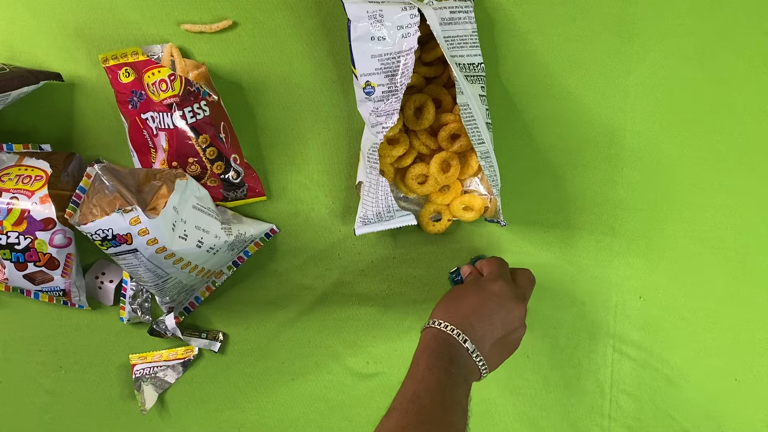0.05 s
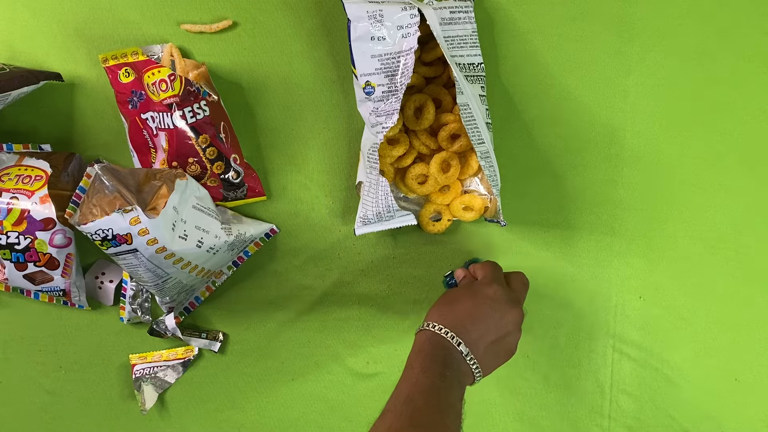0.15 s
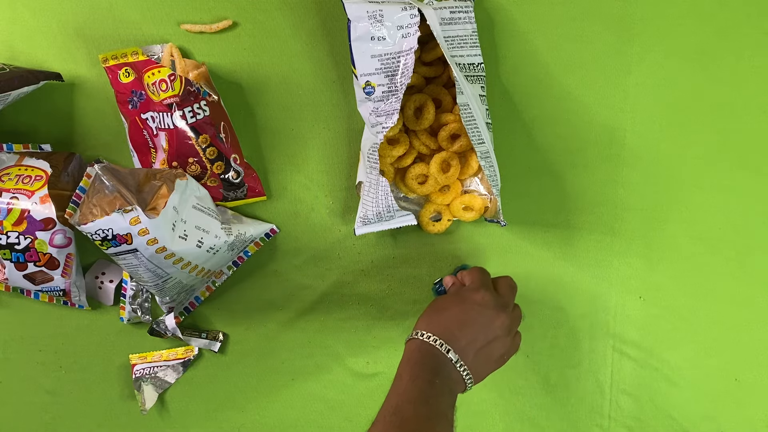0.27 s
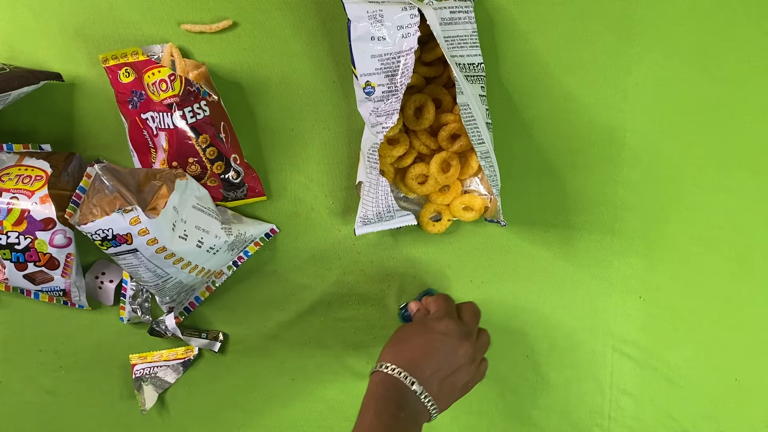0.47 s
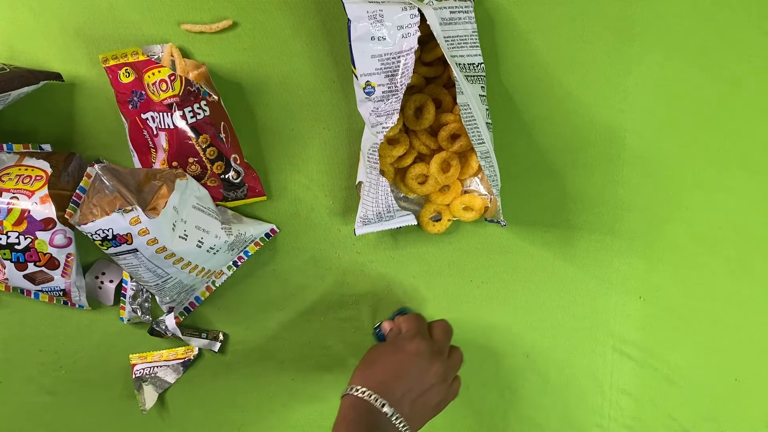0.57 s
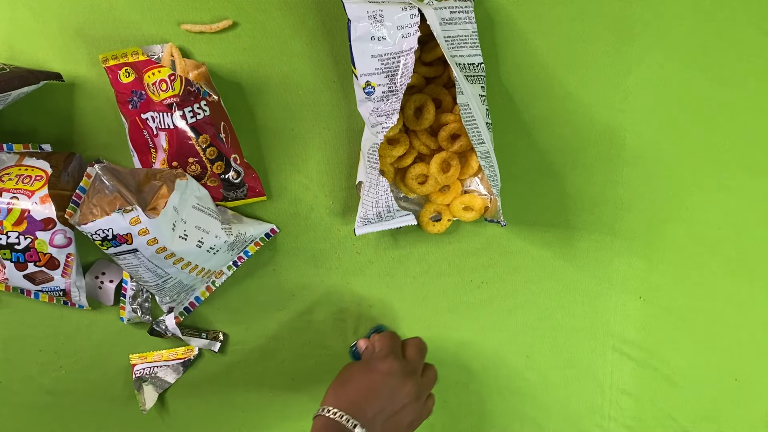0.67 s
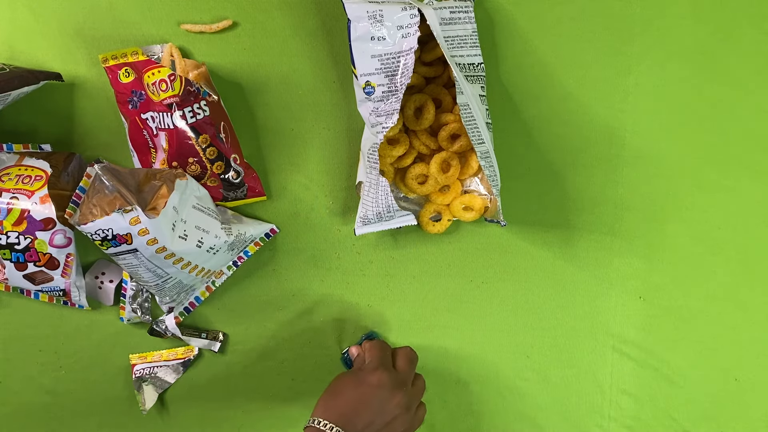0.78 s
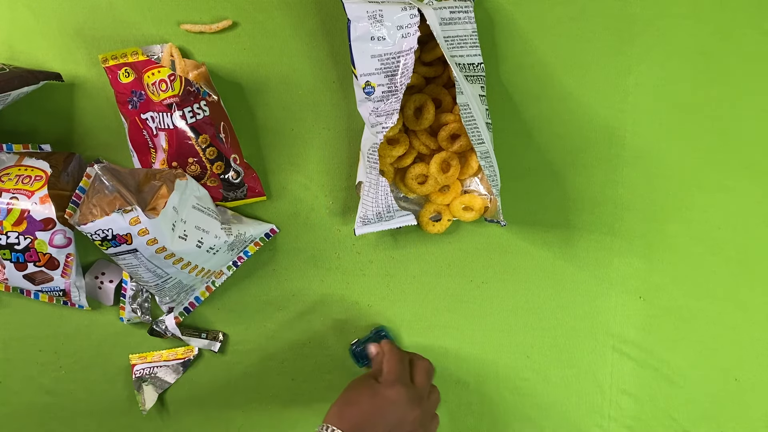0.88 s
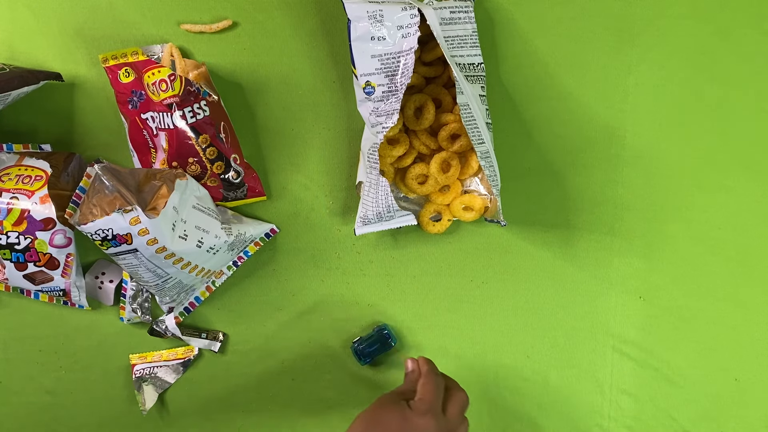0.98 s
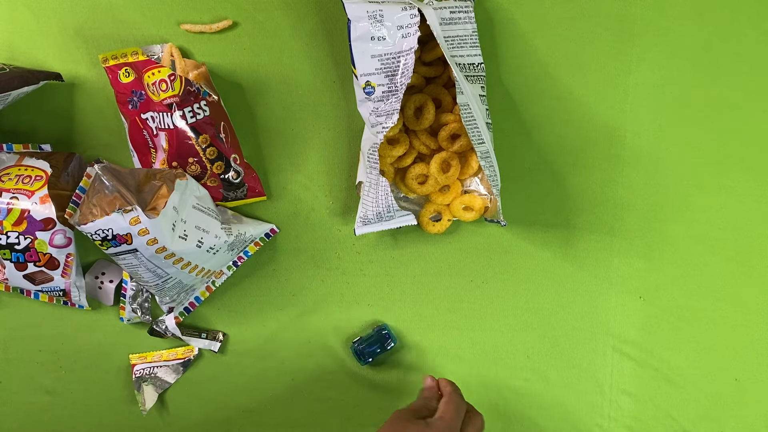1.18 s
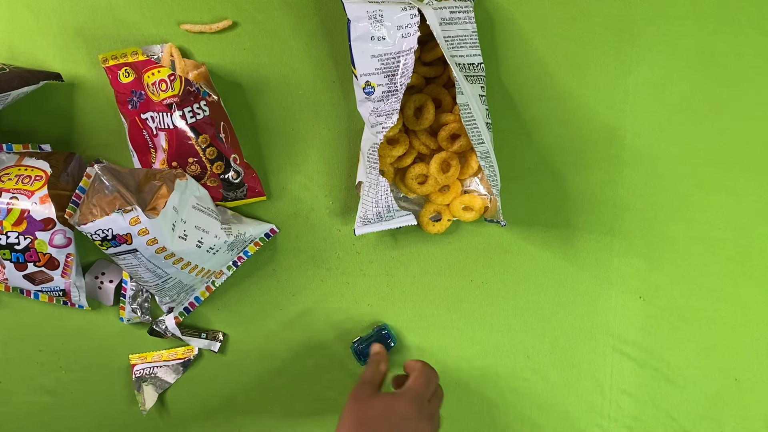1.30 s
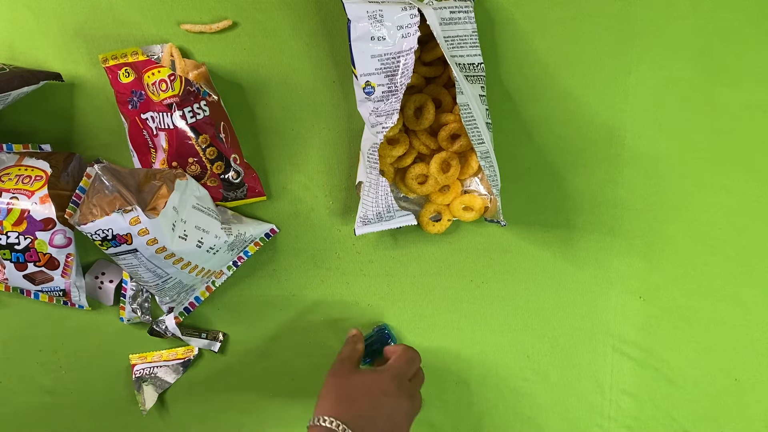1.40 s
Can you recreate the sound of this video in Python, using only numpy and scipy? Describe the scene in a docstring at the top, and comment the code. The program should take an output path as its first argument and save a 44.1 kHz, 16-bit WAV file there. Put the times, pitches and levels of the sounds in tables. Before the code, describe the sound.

A small plastic pull-back toy ratchets with quick clicks across a table, then a light tap.

```python
"""A table in a bare, quiet room with a low hum, a stereo pair of microphones close by.
A small plastic pull-back toy is drawn across the top: its ratchet snaps fifteen times, faster and then
easing off. Each snap rings the hollow shell and knocks the chassis, over faint gear chatter, wheel
rumble and soft thuds in the table. The fingers let go with two light taps and the spring rings."""
import sys
import numpy as np
from scipy import signal
from scipy.fft import rfft, irfft, next_fast_len
from scipy.io import wavfile

SR = 44100
rng = np.random.default_rng(int(sys.argv[2]) if len(sys.argv) > 2 else 0)


def unload_audio(sound):
    """Save the sound as a 16-bit wav file, at the path given as the first command line argument."""
    columns = np.transpose(np.atleast_2d(sound))
    # keep every value between -1 and 1, then stretch to whole-number steps
    steps = np.round(np.clip(columns, -1, 1) * 32767)
    wavfile.write(sys.argv[1], SR, steps.astype(np.int16))


N = 63945

# room tone spectrum: f/Hz, level/dB
ROOM_TONE = [(15, -50.5), (25, -24), (55, -3), (100, -4), (150, -12), (210, -14), (300, -20), (420, -25.5),
             (750, -31), (1400, -40.5), (6000, -46), (10000, -56.5), (15000, -63)]
ROOM_TONE_DB, HUM_HZ, HUM_DB = -65, 95.7, -73
# likeness of room tone and rumble at the two microphones: f/Hz, correlation
COHERENCE = [(60, .95), (250, 0.92), (600, 0.74), (2000, 0.11)]

# level of gear chatter and wheel rumble, a faint fading tail at the start, then the pull: t/s, level/dB
ROLLING_LEVEL = [(0, -19.5), (.03, -42.5), (0.141, -35.5), (0.168, -19.5), (.235, -26), (0.269, -6),
                 (.37, -10), (.42, -5.5), (.55, -2), (.64, -3.5), (0.712, -3), (.75, -14.5), (0.949, -20.5),
                 (1.0, -53.5)]
# gear chatter spectrum: f/Hz, level/dB
GEARS = [(300, -12), (1100, -7), (1900, -6), (2800, 3), (3300, 1.5), (3900, -4), (5000, -8), (6700, 2),
         (8400, -6), (10500, -11.5), (13300, -16), (15300, -12.5)]
# spectrum of wheels on the table: f/Hz, level/dB
WHEELS = [(25, -24.5), (60, 2), (100, -6.5), (160, -5), (230, -3), (380, -14), (700, -16.5), (1500, -32.5),
          (4000, -48)]
GEAR_DB, TEETH_PER_S, WHEEL_DB = -47, 900, -55.5

# fingers gripping and letting go: t/s, level/dB
TAPS = [(0.167, -56), (0.2059, -53), (0.8763, -32), (0.9089, -42.5)]
# spectrum of a tap on the body: f/Hz, level/dB
TAP_COLOUR = [(200, -6.5), (600, -19.5), (1100, -1.5), (1900, -4.5), (2800, 4.5), (3600, -0.5),
              (4250, -3.5), (4700, 2.5), (5300, -8.5), (6700, 1.5), (10000, -7), (15500, -10.5)]
TAP_DB, TAP_RISE_S, TAP_RING_DB = -7.5, 0.0025, -10.5
BRUSH_DB, BRUSH_S = -14.5, 0.01
# spring modes: multiple of SPRING_HZ, level/dB
SPRING_MODES = [(0.999, 5), (1.015, -7), (1.077, -7), (1.68, 1), (1.72, -8.5), (1.76, -9)]
SPRING_HZ, SPRING_DB, SPRING_T60_S = 2765, -23.5, 0.24

# bumps through the table top: t/s, level/dB
BUMPS = [(.245, -54), (.37, -56.5), (0.577, -48), (.61, -45.5), (0.948, -54.5), (1.105, -54.5),
         (1.344, -57.5)]

# ratchet snaps: t/s, snap level/dB, knock level/dB, ring level/dB, shell f/Hz
SNAPS = [(0.2461, -19.3, -46, -36, 2720), (0.3058, -18.5, -46, -39, 2740), (0.3581, -20.4, -49, -38, 2670),
         (0.4017, -20.7, -50, -33, 2670), (0.4375, -20.5, -44, -36, 2640), (0.4672, -19.2, -44, -43, 2830),
         (0.492, -20.2, -44, -41, 2790), (0.5169, -20.1, -43, -37, 2740), (0.5427, -19.4, -41, -36, 2910),
         (0.5679, -18.8, -44, -37, 2810), (0.594, -22.0, -44, -33, 2750), (0.6223, -22.0, -47, -32, 2790),
         (0.6481, -22.0, -42, -39, 2930), (0.6774, -19.9, -44, -38, 2860), (0.7094, -21.2, -43, -41, 3030)]
# spectrum of the pawl's snap: f/Hz, level/dB
SNAP_COLOUR = [(150, -22), (500, -23), (1200, -14), (1450, -7.5), (1950, -16), (3000, -2.5), (3800, -12),
               (4900, -5.5), (5700, -7), (7200, 3.5), (9500, -3), (11500, -2.5), (13300, -6), (15300, 1.5),
               (16200, -14)]
SNAP_DB, SNAP_RISE_S, SNAP_T60_S = -2, 0.0013, 0.0066
CLIMB_DB, CLIMB_S, SLIDE_DB, SLIDE_T60_S = -20.5, 0.003, -21, 0.075
# chassis modes: f/Hz, level/dB, T60/s
CHASSIS_MODES = [(864, -6, 0.041), (1080, 1, 0.02), (1458, 1, .016)]
# hollow shell modes: multiple of the shell pitch, level/dB, T60/s
SHELL_MODES = [(1, 2, 0.021), (.95, -26, .01), (1.08, -5.5, .01)]
KNOCK_DB, RING_DB = 1, 3.5

# the gearbox whirr's two swells: t/s, level/dB
WHIRR_SWELLS = [(0.382, -73), (0.406, -45), (0.439, -48.5), (0.471, -55), (0.601, -61.5), (0.634, -47),
                (.665, -45), (0.699, -69.5), (.75, -110)]
# gearbox resonance near 4 kHz: f/Hz, level/dB
WHIRR_COLOUR = [(2500, -42), (3500, -5.5), (3850, -2.5), (4250, -0.5), (4700, -9), (6500, -34)]

# decay of the room's tail: f/Hz, T60/s
ROOM_T60 = [(200, 0.32), (1000, 0.34), (2800, 0.4), (7000, 0.35), (11000, 0.37), (15500, 0.25)]
# spectrum of the room's tail: f/Hz, level/dB
ROOM_COLOUR = [(200, 2.5), (1000, 6), (2800, -1), (5000, 4), (7000, 1.5), (8400, -10), (10500, 3),
               (13300, -11), (15300, 1.5)]
ROOM_DB, ROOM_RISE_S, ROOM_LEFT_DB, RUMBLE_LEFT_DB = -2.5, 0.0039, 1, 1.64
# echoes off nearby surfaces: delay t/s, level/dB
ECHOES = [(.0037, -13.5), (.0056, -14.5), (0.0127, -25.5)]
# gain at the left microphone and equal loss at the right: f/Hz, level/dB
LEFT_GAIN = [(300, 5), (1200, 1.5), (2800, .8), (5000, 3.6), (7000, 1.5), (8400, -1), (10000, -0.5),
             (15000, 0)]
# lag of the left microphone behind the right: f/Hz, t/s
LEFT_LAG = [(1400, 0), (2700, -.00004), (5000, -.00004), (8000, .00007), (12000, .0001), (15300, .000125)]
LOW_CUT_HZ, HIGH_CUT_HZ = 32.8, 16400

TIME = np.arange(N) / SR
SIDES = np.array([[1], [-1]])  # left, right


def amp(db):
    """Decibels to gain."""
    return 10 ** (np.asarray(db) / 20)


def unit(x):
    """Scale to rms 1."""
    return x / np.sqrt(np.mean(x ** 2) + 1e-20)


def along(points, hz):
    """(f/Hz, value) points read on a log axis."""
    f, values = np.transpose(points)
    return np.interp(np.log(hz + 1), np.log(f + 1), values)


def filtered(x, response):
    """x times a complex response of frequency."""
    size = next_fast_len(N + SR // 2)
    return irfft(rfft(x, size) * response(np.fft.rfftfreq(size, 1 / SR)), size)[..., :N]


def coloured(x, spectrum, size=1024):
    """x through a causal filter of unit energy with the given spectrum."""
    cepstrum = irfft(np.log(amp(along(spectrum, np.fft.rfftfreq(size, 1 / SR)))))
    cepstrum[1:size // 2] *= 2  # fold to minimum phase
    cepstrum[size // 2 + 1:] = 0
    kernel = irfft(np.exp(rfft(cepstrum)))
    return signal.fftconvolve(x, kernel / np.linalg.norm(kernel))[:N]


def since(start):
    """Seconds since start at every sample, 0 before it."""
    return np.maximum(TIME - start, 0)


def swell(t, rise_s, t60):
    """A quick rise, then an even decay."""
    return np.minimum(t / rise_s, 1) ** 2 * np.exp(-np.log(1000) * np.maximum(t - rise_s, 0) / t60)


def burst(envelope, spectrum):
    """A cluster of tiny contacts heard through the plastic."""
    return coloured(envelope * rng.choice([-1, 1], N), spectrum)


def mode(t, hz, t60, rise_s=SNAP_RISE_S):
    """One struck resonance."""
    return swell(t, rise_s, t60) * np.sin(2 * np.pi * hz * t)


def rumble(spectrum):
    """Stereo noise of rms 1, nearly mono in the bass and leaning left."""
    def mid_side_gains(hz):
        angle = np.arccos(np.clip(along(COHERENCE, hz), -1, 1)) / 2
        return amp(along(spectrum, hz)) * [np.cos(angle), np.sin(angle)]

    mid, side = filtered(rng.standard_normal((2, N)), mid_side_gains)
    return unit((mid + SIDES * side) * amp(SIDES * RUMBLE_LEFT_DB))


def mic_pair(hz):
    """Level and arrival differences between the two microphones."""
    return amp(SIDES * along(LEFT_GAIN, hz)) * np.exp(-1j * np.pi * hz * SIDES * along(LEFT_LAG, hz))


def in_room(x):
    """Direct sound, near echoes and a diffuse tail at the pair; the reflections vary with each call."""
    hz, t, noise = signal.stft(rng.standard_normal((2, SR // 2)), SR, nperseg=256)
    decay = np.exp(-np.log(1000) * t / along(ROOM_T60, hz)[:, None])
    tail = signal.istft(noise * decay * amp(along(ROOM_COLOUR, hz))[:, None], SR, nperseg=256)[1]
    tail *= 1 - np.exp(-np.arange(tail.shape[1]) / SR / ROOM_RISE_S)
    diffuse = signal.fftconvolve(x[None], tail / np.linalg.norm(tail[0]), axes=1)[:, :N]
    paths = np.zeros((2, SR // 10))
    paths[:, 0] = 1
    for delay, db in ECHOES:
        arrivals = np.round(delay * SR * rng.uniform(.95, 1.05, 2)).astype(int)
        paths[[0, 1], arrivals] += amp(db)
    near = signal.fftconvolve(x[None], paths, axes=1)[:, :N]
    return filtered(near, mic_pair) + amp(ROOM_DB + SIDES * ROOM_LEFT_DB) * diffuse


def room_tone():
    """Low room rumble with a steady hum in the centre."""
    hum = np.sin(2 * np.pi * (HUM_HZ * TIME + rng.random()))
    return amp(ROOM_TONE_DB) * rumble(ROOM_TONE) + amp(HUM_DB) * hum


def rolling():
    """Gear teeth chatter and wheels rumble: a faint tail fades at the start, then the pull swells."""
    level = amp(np.interp(TIME, *np.transpose(ROLLING_LEVEL)))
    teeth = unit(burst(rng.random(N) < TEETH_PER_S / SR, GEARS))
    wheels = amp(WHEEL_DB) * level ** 0.52 * rumble(WHEELS)  # swells less steeply than the gears
    return in_room(amp(GEAR_DB) * level * teeth) + wheels


def finger_taps():
    """A finger brushes and taps the shell, which rings briefly; the wound spring rings on."""
    out = np.zeros(N)
    for start, db in TAPS:
        t = since(start)
        brush = amp(BRUSH_DB) * np.exp(-np.abs(TIME - start) / BRUSH_S)
        tap = burst(brush + swell(t, TAP_RISE_S, t60=0.017), TAP_COLOUR)
        shell = mode(t, SPRING_HZ, t60=0.022, rise_s=TAP_RISE_S)
        spring = sum(amp(level) * mode(t, ratio * SPRING_HZ, SPRING_T60_S / ratio ** 2, TAP_RISE_S)
                     for ratio, level in SPRING_MODES)
        out += amp(db) * (amp(TAP_DB) * tap + amp(TAP_RING_DB) * shell + amp(SPRING_DB) * spring)
    return in_room(out)


def table_thuds():
    """The table top thuds faintly under the hand."""
    return sum(amp(db) * mode(since(start), hz=106, t60=0.37, rise_s=0.0033) for start, db in BUMPS)


def ratchet():
    """The pawl scrapes up each tooth, drops with a snap and a short slide, and rings chassis and shell."""
    out = np.zeros((2, N))
    for start, snap_db, knock_db, ring_db, shell_hz in SNAPS:
        t = since(start)
        climb = amp(CLIMB_DB) * np.exp(-np.abs(TIME - start - SNAP_RISE_S) / CLIMB_S)
        drop = swell(t, SNAP_RISE_S, SNAP_T60_S)
        slide = amp(SLIDE_DB) * swell(t, SNAP_RISE_S, SLIDE_T60_S)
        snap = burst(climb, GEARS) + burst(drop + slide, SNAP_COLOUR)
        knock = sum(amp(db) * mode(t, hz * rng.normal(1, 0.055), t60) for hz, db, t60 in CHASSIS_MODES)
        ring = sum(amp(db) * mode(t, ratio * shell_hz, t60) for ratio, db, t60 in SHELL_MODES)
        body = amp(knock_db + KNOCK_DB) * knock + amp(ring_db + RING_DB) * ring
        out += in_room(amp(snap_db + SNAP_DB) * snap + body)
    return out


def gearbox_whirr():
    """Meshing teeth excite a narrow resonance of the gearbox."""
    teeth = unit(burst(rng.random(N) < TEETH_PER_S / SR, WHIRR_COLOUR))
    swells = amp(np.interp(TIME, *np.transpose(WHIRR_SWELLS), left=-np.inf))
    return in_room(swells * teeth)


def scene():
    """The toy, the table and the room as they reach the microphones."""
    return room_tone() + rolling() + finger_taps() + table_thuds() + ratchet() + gearbox_whirr()


def record(dry):
    """The recorder cuts the deepest bass and keeps nothing above its band limit."""
    def passband(hz):
        low_cut = 1 - 1 / (1 + (hz / LOW_CUT_HZ) ** 4)
        return low_cut / (1 + (hz / HIGH_CUT_HZ) ** 120)

    return filtered(dry, passband)


dry = scene()
out = record(dry)
unload_audio(out)
```